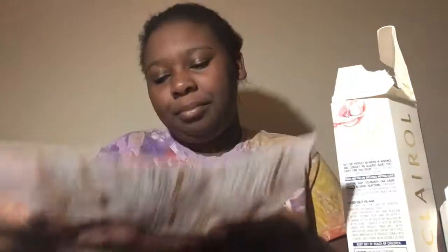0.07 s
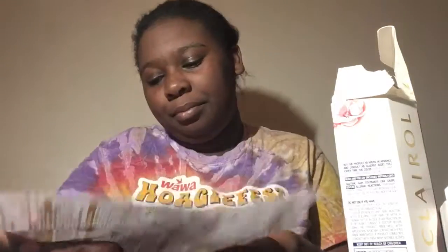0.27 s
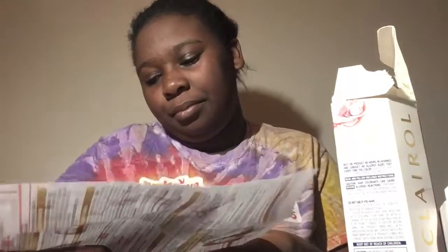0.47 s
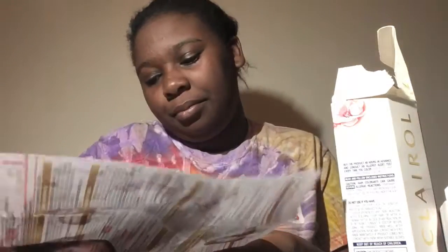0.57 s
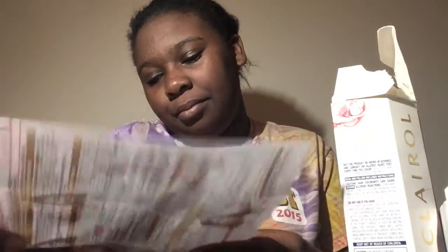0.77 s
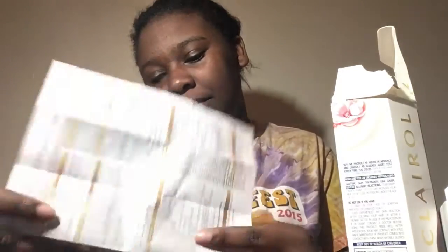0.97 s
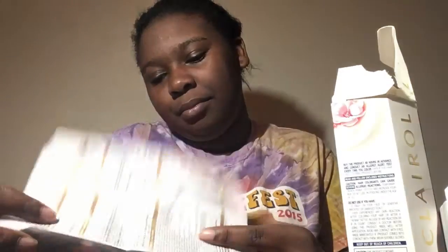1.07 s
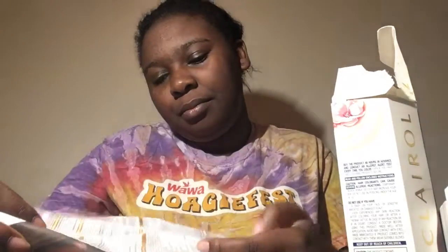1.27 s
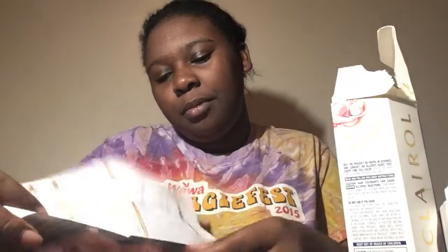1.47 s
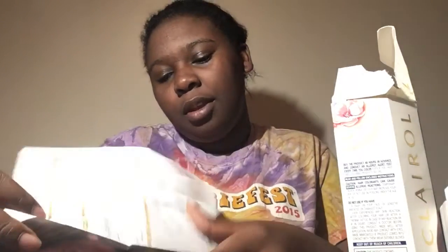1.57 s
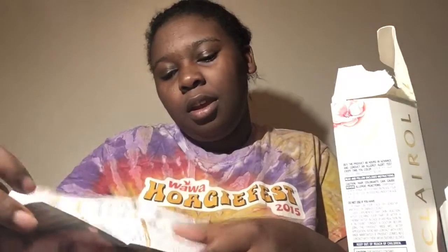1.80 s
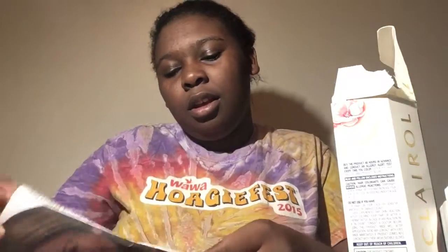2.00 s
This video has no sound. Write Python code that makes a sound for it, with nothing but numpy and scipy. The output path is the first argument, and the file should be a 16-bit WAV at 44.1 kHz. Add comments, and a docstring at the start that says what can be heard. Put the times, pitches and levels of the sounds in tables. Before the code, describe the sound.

Close, dry paper crinkling indoors: soft hiss and small crackles, a sudden sharp flap and crackle as the sheet turns over, then irregular snaps, pops and short crunches, with faint steady hum and hiss behind.

```python
"""A large paper leaflet is unfolded and turned over close to the microphone in a small room.
Creases snap singly or crunch in short runs: each kick excites clicks, rings and decaying noise bands.
Flexing panels rustle (grain-driven noise), flap (low ragged cycles) and pop (a short pitched knock).
Paper slides over paper with a soft, slightly uneven hiss.
Behind it lie steady coloured room noise and a faint hum."""
import sys
import numpy as np
from scipy import signal
from scipy.io import wavfile

SR = 44100
rng = np.random.default_rng(int(sys.argv[2]) if len(sys.argv) > 2 else 0)


def bounce(signal):
    """Save signal as a 16-bit WAV file at the path given by the first command-line argument."""
    frames = np.transpose(np.atleast_2d(signal))
    limited = np.clip(frames, -1, 1)
    pcm = np.round(limited * 32767).astype(np.int16)
    wavfile.write(sys.argv[1], SR, pcm)


N = 90008  # length in samples

EDGES = 1000 * 2 ** (np.arange(-16, 13) / 3)  # third-octave band edges in Hz
# Each band: centre in Hz, bandpass filter
BANDS = [(np.sqrt(lo * hi), signal.butter(2, [lo, hi], "band", fs=SR, output="sos"))
         for lo, hi in zip(EDGES, EDGES[1:])]


def from_db(db):
    """Decibels to gain."""
    return 10 ** (np.asarray(db) / 20)


def unit(x):
    """Scale to rms 1."""
    return x / np.sqrt(np.mean(x ** 2) + 1e-30)


def at_hz(points, hz):
    """Read a table on a log-frequency axis."""
    table_hz, values = np.transpose(points)
    return np.interp(np.log(hz), np.log(table_hz), values)


def level(rows):
    """Turn a dB curve over time into a gain for each sample."""
    return from_db(np.interp(np.arange(N) / SR, *np.transpose(rows)))


def add(out, start_s, x):
    """Mix x into out from start_s, cutting what runs past the end."""
    i = int(np.clip(start_s * SR, 0, N - 1))
    out[i:i + len(x)] += x[:N - i]


def coloured(tone, drive=1):
    """Third-octave noise with a given tone, all bands under one drive; rms 1."""
    white = rng.standard_normal((2, N)) * drive
    total = np.zeros(N)
    for k, (hz, sos) in enumerate(BANDS):
        if hz > tone[0][0] / 2:
            # neighbouring bands take turns on two independent noises
            total += from_db(at_hz(tone, hz)) * unit(signal.sosfilt(sos, white[k % 2]))
    return unit(total)


# Tone of the room noise. Each row: frequency in Hz, relative level in dB per third octave.
FLOOR_TONE = [(25, 3.5), (45, -0.5), (100, -3), (180, -7.5), (300, -3), (800, -10), (2000, -39),
              (8000, -3.5), (15500, -7)]
FLOOR_DB = -50


def room_noise():
    """Steady noise of the room, shaped in third octaves."""
    return from_db(FLOOR_DB) * coloured(FLOOR_TONE)


HUM_HZ, HUM_DB = 175.8, -61.5  # level as rms


def hum():
    """A faint steady sine in the room."""
    return from_db(HUM_DB) * np.sqrt(2) * np.sin(2 * np.pi * HUM_HZ * np.arange(N) / SR)


# Echoes off near walls. Each row: delay in seconds, level in dB against the direct sound before dulling.
ECHOES = [(0.0115, -16), (0.0301, -29.5)]
# Colour of the diffuse tail. Each row: frequency in Hz, level in dB against the direct sound.
ROOM_TONE = [(150, -30), (900, -11.5), (5000, -17.5), (12000, -21)]
ECHO_DULL_HZ = 4940  # lowpass on the echoes
ROOM_T60_S, ROOM_ONSET_S = 0.34, 0.0089


def room(x, size=18000):
    """Two dull wall echoes and a short diffuse tail of decaying noise."""
    t = np.arange(size) / SR
    white = rng.standard_normal((2, size)) * from_db(-60 * t / ROOM_T60_S) * (t > ROOM_ONSET_S)
    tail = np.zeros(size)
    for k, (hz, sos) in enumerate(BANDS):
        # scale by bandwidth so the table gives each band's gain
        band_scale = np.sqrt(2 * (EDGES[k + 1] - EDGES[k]) / SR / size)
        tail += from_db(at_hz(ROOM_TONE, hz)) * unit(signal.sosfilt(sos, white[k % 2])) * band_scale
    out = x + signal.fftconvolve(x, tail)[:N]
    dull = signal.sosfilt(signal.butter(1, ECHO_DULL_HZ, fs=SR, output="sos"), x)
    for delay_s, db in ECHOES:
        add(out, delay_s, from_db(db) * dull)
    return out


# Paper sliding on paper. Each row: time in seconds, level in dB before SLIDE_TRIM_DB.
SLIDE = [(0, -56), (.1, -42), (.17, -47), (.24, -40.5), (.41, -39.5), (.56, -54.5), (.65, -45),
         (.74, -51.5), (.8, -34.5), (1.04, -43), (1.12, -39), (1.3, -37.5), (1.39, -45), (1.53, -43.5),
         (1.56, -32), (1.69, -52), (1.76, -40), (1.86, -46.5), (1.9, -35.5), (2.04, -41.5)]
# Tone of the hiss. Each row: frequency in Hz, relative level in dB per third octave.
SLIDE_TONE = [(300, -21.5), (1000, -16), (2000, -12.5), (4000, -3), (7000, -4.5), (10000, 2), (13000, -5),
              (15500, -11)]
SLIDE_FLICKER_DB, SLIDE_TRIM_DB = 1.55, -4.5


def slide(count=300):
    """Fibres brush over each other in a slightly uneven hiss."""
    points = rng.standard_normal(count)
    flicker = np.interp(np.linspace(0, count - 1, N), np.arange(count), points)
    hiss = coloured(SLIDE_TONE, from_db(SLIDE_FLICKER_DB * flicker))
    return from_db(SLIDE_TRIM_DB) * level(SLIDE) * hiss


# Flexing of the panels. Each row: time in seconds, level in dB before RUSTLE_TRIM_DB.
FLEX = [(0, -48.5), (.06, -45), (.55, -56.5), (.755, -59), (.785, -28), (.9, -33), (.97, -46),
        (1.19, -39.5), (1.41, -46.5), (1.46, -28.5), (1.51, -40.5), (1.62, -35.5), (1.69, -41.5),
        (1.925, -37.5), (2.0, -43), (2.04, -44)]
# Tone of the rustle. Each row: frequency in Hz, relative level in dB per third octave.
FLEX_TONE = [(70, -14.5), (150, -5), (300, -1.5), (600, 2.5), (900, 6), (1450, 1.5), (2200, 1.5),
             (4000, -4), (8000, -13), (15500, -37)]
GRAINS_PER_S, GRAIN_SPREAD_DB, RUSTLE_TRIM_DB = 1400, 3.5, -1.5


def rustle():
    """Countless faint buckles, as decaying grains of noise, while the panels flex."""
    struck = rng.random(N) < GRAINS_PER_S / SR
    grains = struck * from_db(GRAIN_SPREAD_DB * np.minimum(rng.exponential(1, N), 5))
    fall = np.exp(-1 / (0.0015 * SR))  # grain power fades with a 1.5 ms time constant
    power = signal.lfilter([1], [1, -fall], grains ** 2 + 1e-12)
    return from_db(RUSTLE_TRIM_DB) * level(FLEX) * coloured(FLEX_TONE, np.sqrt(power))


# Panels that flap and push air. Each row: start in seconds, pitch in Hz, level of the swing in dB.
FLAPS = [(.037, 255, -40), (0.833, 55, -30), (0.853, 59.5, -34.5), (0.885, 86, -43), (1.311, 128, -33),
         (1.439, 74, -44), (1.623, 131, -31)]
FLAP_RISE_S, FLAP_ROUGH = 0.0066, 1  # time to the top of the swell, rms of the ragged part


def flaps(size=6000):
    """A swinging panel gives a few ragged cycles of low pressure."""
    out, t = np.zeros(N), np.arange(size) / SR
    swell = t / FLAP_RISE_S * np.exp(1 - t / FLAP_RISE_S)
    for start_s, hz, db in FLAPS:
        sos = signal.butter(2, [hz / 2, hz * 2], "band", fs=SR, output="sos")
        ragged = unit(signal.sosfilt(sos, rng.standard_normal(size)))
        swing = np.sin(2 * np.pi * hz * t)
        add(out, start_s, from_db(db) * swell * (swing + FLAP_ROUGH * ragged))
    return out


MODE_RING_CYCLES = 27.3  # cycles until a mode of the paper has died by 60 dB
# Panels that pop through with a pitched knock.
# Each row: start in seconds, pitch in Hz, level in dB before the rise and decay.
POPS = [(1.592, 936, -19), (1.779, 558, -20.5), (2.0318, 2000, -11)]
POP_RISE_S = 0.00056  # time constant


def pops(size=4000):
    """One mode of the panel stands out and rings for a moment."""
    out, t = np.zeros(N), np.arange(size) / SR
    rise = 1 - np.exp(-t / POP_RISE_S)
    for start_s, hz, db in POPS:
        decay = from_db(db - 60 * t * hz / MODE_RING_CYCLES)
        add(out, start_s, decay * rise * np.sin(2 * np.pi * hz * t))
    return out


def ring(clicks, hz):
    """One mode of the paper, a two-pole resonance set ringing by clicks; rms 1."""
    radius = from_db(-60 * hz / (MODE_RING_CYCLES * SR))
    angle = 2 * np.pi * hz / SR
    return unit(signal.lfilter([0, 1], [1, -2 * radius * np.cos(angle), radius ** 2], clicks + 1e-18))


def crack(clicks, tone):
    """Colour clicks by a third-octave tone without blunting their attack (minimum phase); rms 1."""
    hz = np.maximum(np.abs(np.fft.fftfreq(len(clicks), 1 / SR)), EDGES[0])
    log_gain = np.log(from_db(at_hz(tone, hz)) / np.sqrt(hz))
    minimum_phase = np.exp(np.conj(signal.hilbert(log_gain)))
    return unit(np.fft.ifft(np.fft.fft(clicks) * minimum_phase).real)


# Centres of the body, crack and edge registers, in Hz.
REGISTER_HZ = (770, 2470, 9400)
# Tone of a buckle, added to its register levels. Each row: frequency in Hz, level in dB per third octave.
BUCKLE_TONE = [(110, -23), (400, -18.5), (650, -14.5), (950, -4.5), (1500, -12.5), (2300, -9), (3800, -3.5),
               (5500, -6), (9000, -5.5), (12000, -8.5), (15500, -64)]
# Ring of the sheet's dense modes. Each row: frequency in Hz, time to fall by 60 dB in seconds.
SHEET_RING = [(150, 0.035), (900, 0.044), (3000, 0.026), (9000, 0.011)]
SPREAD_S = 0.000077  # time for a bend to spread over the panel, at 1 kHz
CLICK_SHARE = 0.19  # the bare click of a buckle against the ring that follows
# rings against the level of their register
CREASE_RING_DB, BODY_RING_DB, BODY_RING_HZ = -3, -6.5, 918.5
LEVEL_SPAN_S = 0.01  # register levels are rms over this span


def buckle(kicks, register_db, ring_hz):
    """Kicks crack, ring crease and panel, and shake dense modes: treble is instant, lows swell and linger."""
    count = len(kicks)
    out, register = np.zeros(count), list(zip(REGISTER_HZ, register_db))
    tone = [(hz, at_hz(BUCKLE_TONE, hz) + at_hz(register, hz)) for hz, sos in BANDS]
    white = rng.standard_normal((2, count))
    clicks = unit(kicks * rng.choice([-1, 1], count))
    for k, (hz, sos) in enumerate(BANDS):
        if hz < BUCKLE_TONE[0][0]:
            continue
        # fall and rise act on power, so -120 here is 60 dB of decay
        fall = from_db(-120 / (at_hz(SHEET_RING, hz) * SR))
        rise = np.exp(-hz / (1000 * SPREAD_S * SR))
        power = signal.lfilter([1], [1, -fall - rise, fall * rise], kicks ** 2 + 1e-18)
        # run the noise twice and keep the second pass, with the filter already settled
        modes = signal.sosfilt(sos, np.tile(white[k % 2], 2))[count:]
        out += from_db(at_hz(tone, hz)) * unit(np.sqrt(power) * modes)
    out += CLICK_SHARE * out.std() * crack(clicks, tone)
    for hz, db in ((ring_hz, CREASE_RING_DB), (BODY_RING_HZ, BODY_RING_DB)):
        out += from_db(at_hz(register, hz) + db) * ring(clicks, hz)
    return out * np.sqrt(LEVEL_SPAN_S * SR / count)


# Single creases that snap.
# Each row: start in seconds, body level in dB, crack level in dB, edge level in dB, ring in Hz.
SNAPS = [(0.0344,-46,-45.5,-36.5,3830), (0.0396,-30.5,-35,-42.5,3630), (0.0659,-37.5,-40,-47,2470),
         (0.1923,-42,-42.5,-76,2400), (.2472,-46,-33.5,-51,1900), (0.2552,-50,-45,-64,1890),
         (.526,-46,-65,-57,1270), (0.571,-64,-75,-49,11700), (0.6992,-46,-47,-73,2350),
         (0.8044,-25,-31,-37,3770), (0.8472,-26.5,-22.5,-18.5,9240), (0.8911,-19,-25.5,-18,8360),
         (0.9205,-27.5,-32.5,-34,3110), (0.9365,-27,-38,-49,2120), (.992,-35.5,-41,-49,4040),
         (1.1421,-30.5,-25.5,-29,2570), (1.1668,-29,-34.5,-44,2330), (1.1752,-32,-23.5,-31.5,3280),
         (1.192,-27.5,-28,-40,3560), (1.2545,-34,-31.5,-47,2900), (1.2794,-30,-34,-37,1950),
         (1.3115,-27.5,-36,-30.5,4150), (1.3641,-31.5,-28,-42,3260), (1.4318,-28.5,-24.5,-27,2090),
         (1.45,-40,-28.5,-36.5,3470), (1.5221,-23.5,-27,-33.5,3430), (1.5311,-34.5,-34,-50,1920),
         (1.7784,-33.5,-28,-32,2130), (1.8077,-35,-34.5,-48,2120), (1.9629,-31.5,-27.5,-24.5,9300),
         (2.0317,-30.5,-29,-36,3930)]


def snaps(size=3000):
    """A crease snaps: one kick each."""
    out = np.zeros(N)
    for start_s, *register_db, ring_hz in SNAPS:
        add(out, start_s, buckle(signal.unit_impulse(size), register_db, ring_hz))
    return out


# Folds that give way in a run of tiny buckles. Each row: start in seconds, length in seconds,
# body level in dB, crack level in dB, edge level in dB, ring in Hz.
CRUNCHES = [(0.056,0.0058,-47,-27,-58,3380), (.785,0.019,-30,-33,-44,2700),
            (.797,0.0098,-25.5,-27,-35.5,2060), (0.811,.005,-34.5,-26,-34,3850),
            (0.849,0.0043,-24.5,-24,-12.5,6550), (0.857,0.0092,-42,-26,-26,1900),
            (0.879,0.0088,-23,-22,-35,3650), (0.897,.012,-27,-29.5,-48,1960),
            (1.318,.006,-24.5,-26,-31,3580), (1.4317,0.0067,-22.5,-24,-27.5,4180),
            (1.585,0.021,-32.5,-38.5,-30,3580), (1.7165,0.0056,-26.5,-31,-44,1930),
            (1.892,0.017,-31,-37,-29.5,4100), (1.911,0.0037,-25.5,-22,-45,3590),
            (1.9227,0.014,-24,-30.5,-38,2650)]
BUCKLES_PER_S, BUCKLE_SPREAD_DB = 1000, 3.5


def crunches(size=3000):
    """A fold gives way: a quick run of kicks, uneven in time and strength."""
    out = np.zeros(N)
    for start_s, length_s, *register_db, ring_hz in CRUNCHES:
        times = (np.arange(size) + rng.random(size)) / BUCKLES_PER_S
        strengths = from_db(rng.normal(0, BUCKLE_SPREAD_DB, size))
        in_run = times < length_s
        kicks = signal.unit_impulse(size)
        kicks[(times[in_run] * SR).astype(int)] = strengths[in_run]
        add(out, start_s, buckle(kicks, register_db, ring_hz))
    return out


def scene():
    """The paper in the room, with dry pops and flaps, over the room's own noise and hum."""
    paper = snaps() + crunches() + rustle() + slide()
    return (room(paper) + pops() + flaps() + room_noise() + hum())[None]


LOW_CUT_HZ, CUTOFF_HZ = 33.6, 16100
OVERLOAD = 0.85  # amplitude at which peaks flatten


def record(dry):
    """The deepest bass is removed, the microphone flattens peaks past its overload, and the top is cut."""
    low_cut = signal.butter(4, LOW_CUT_HZ, "high", fs=SR, output="sos")
    top_cut = signal.ellip(10, 0.1, 80, CUTOFF_HZ, fs=SR, output="sos")
    x = signal.sosfilt(low_cut, dry)
    return signal.sosfilt(top_cut, np.clip(x, -OVERLOAD, OVERLOAD))


dry = scene()
out = record(dry)
bounce(out)
```